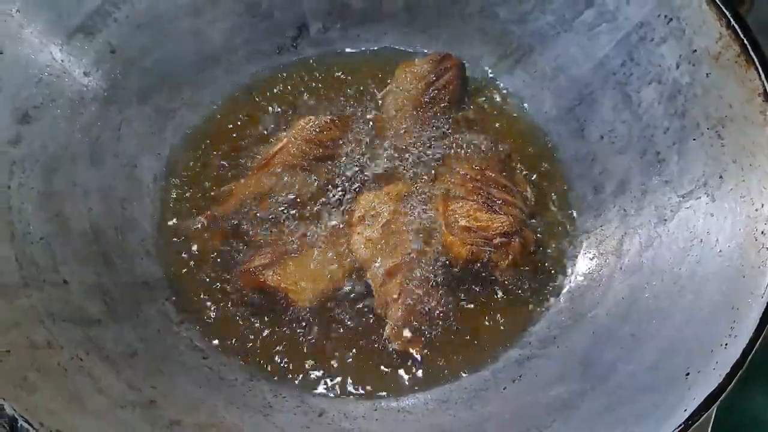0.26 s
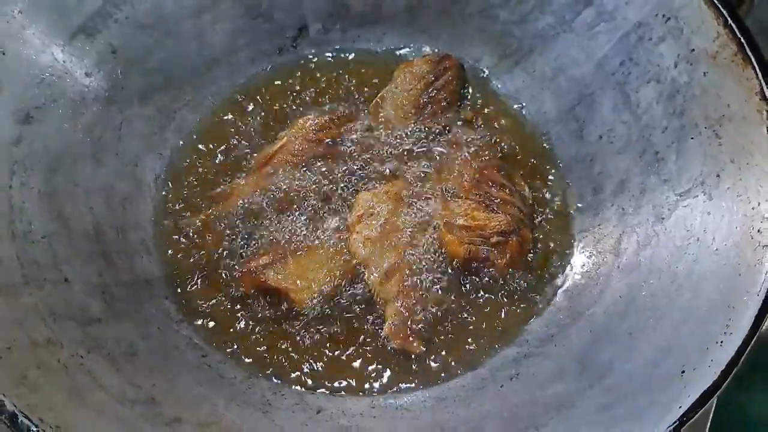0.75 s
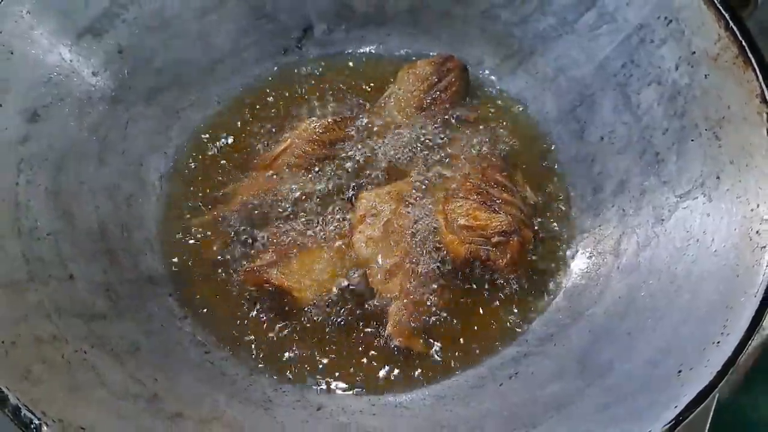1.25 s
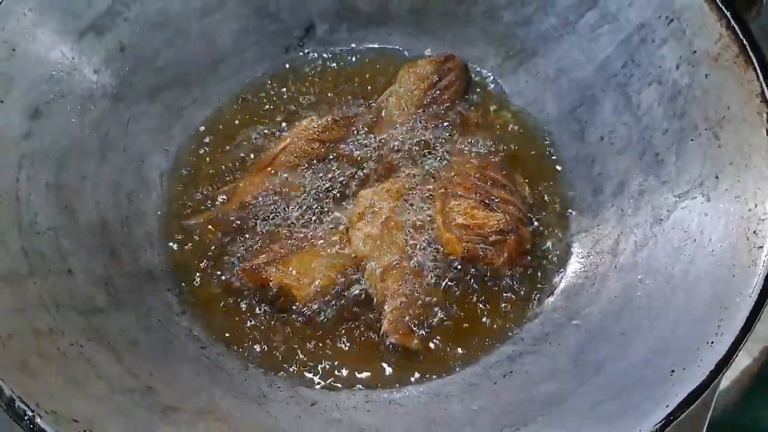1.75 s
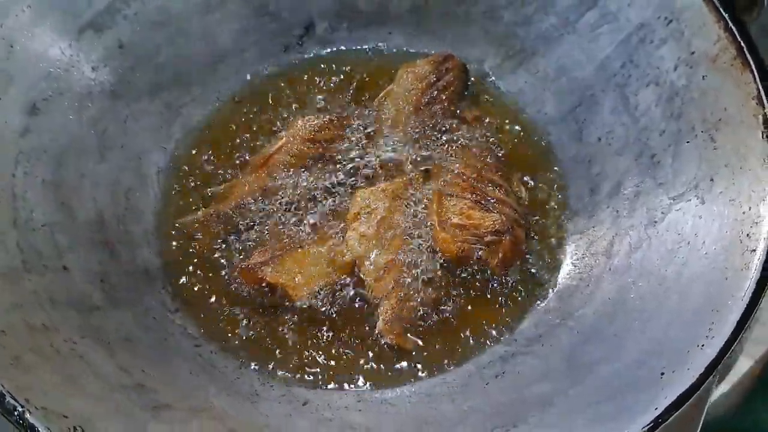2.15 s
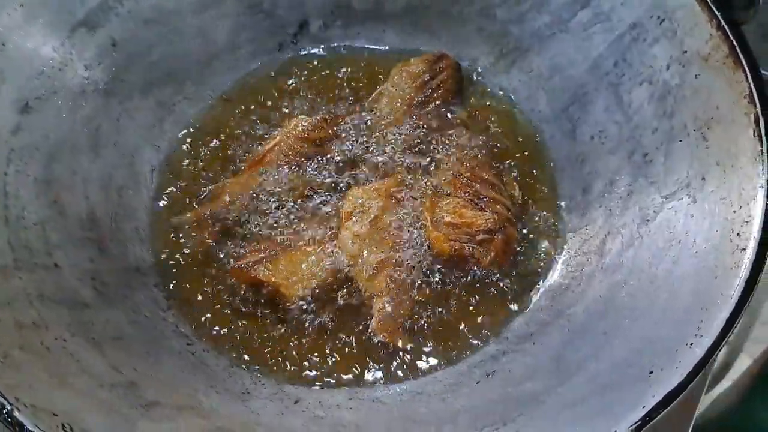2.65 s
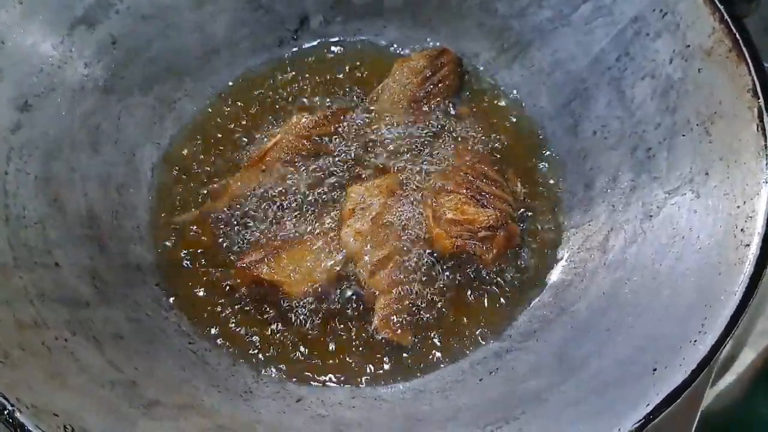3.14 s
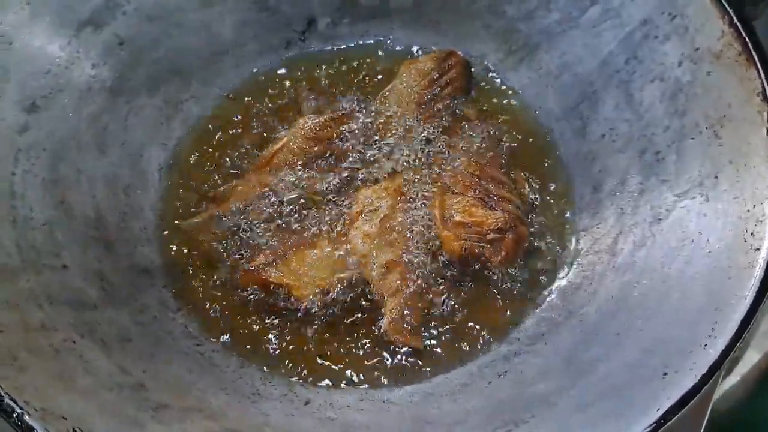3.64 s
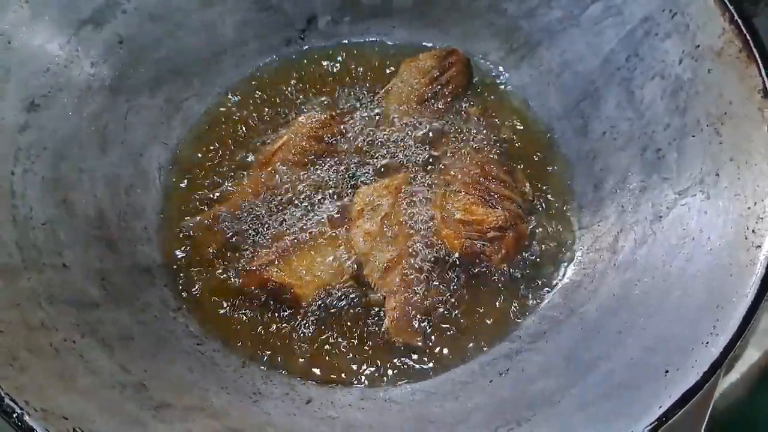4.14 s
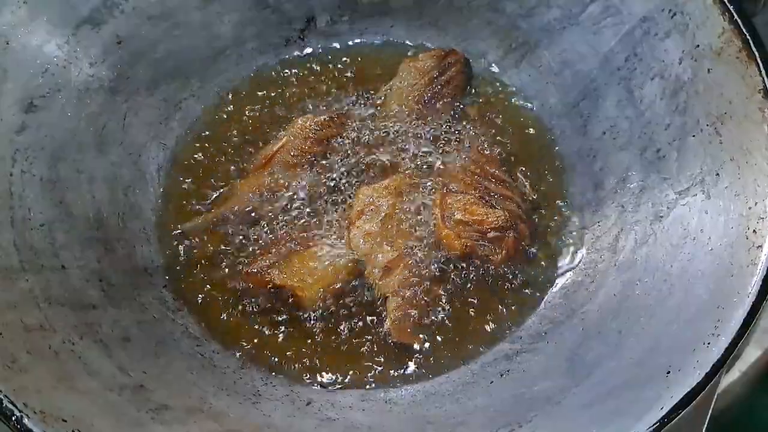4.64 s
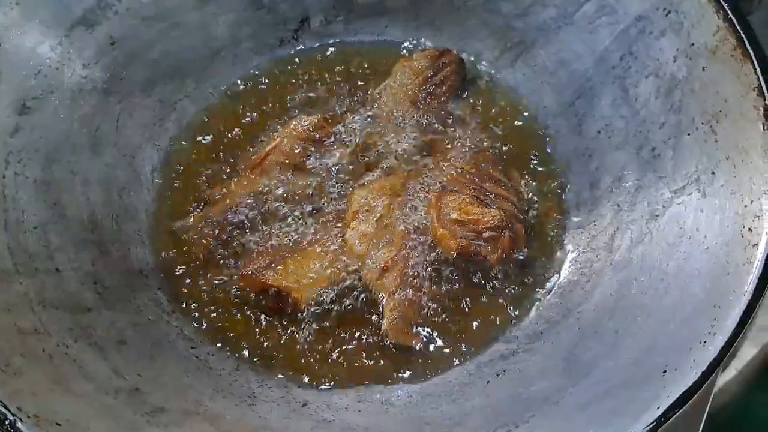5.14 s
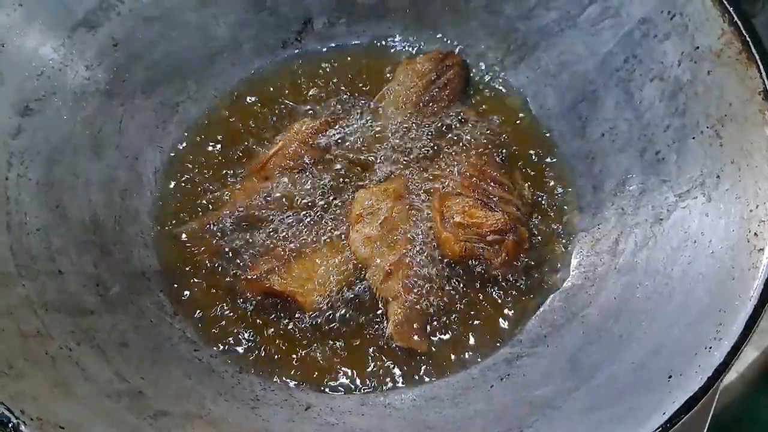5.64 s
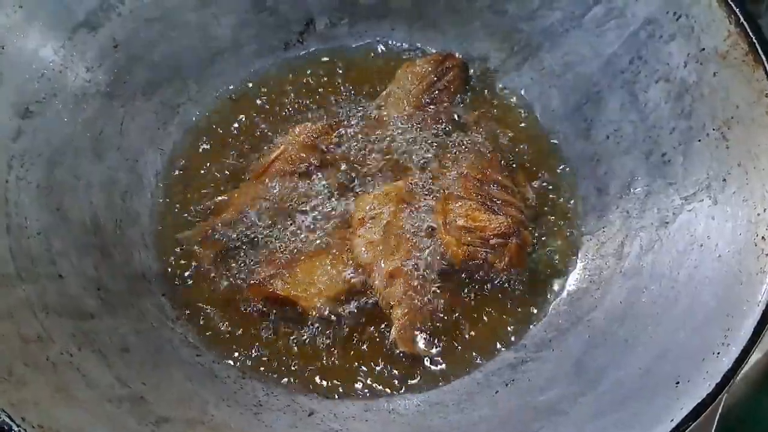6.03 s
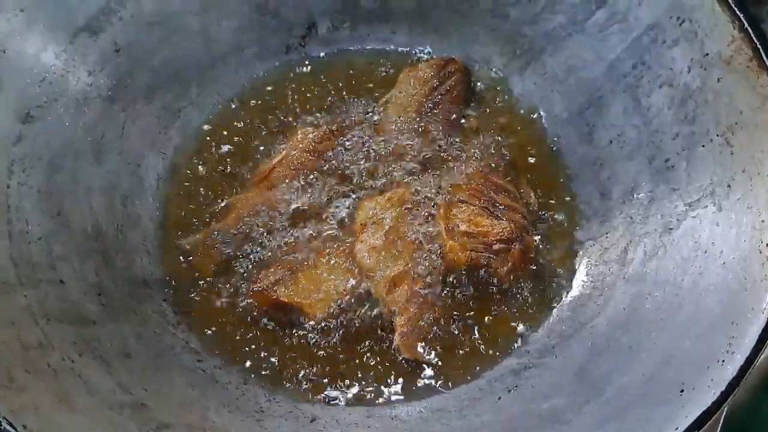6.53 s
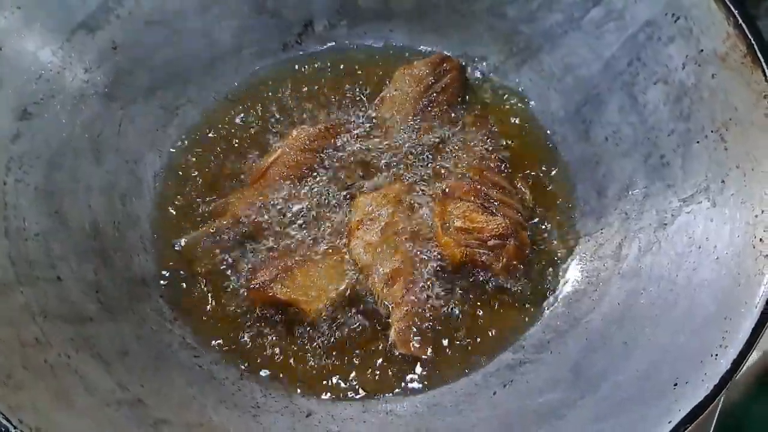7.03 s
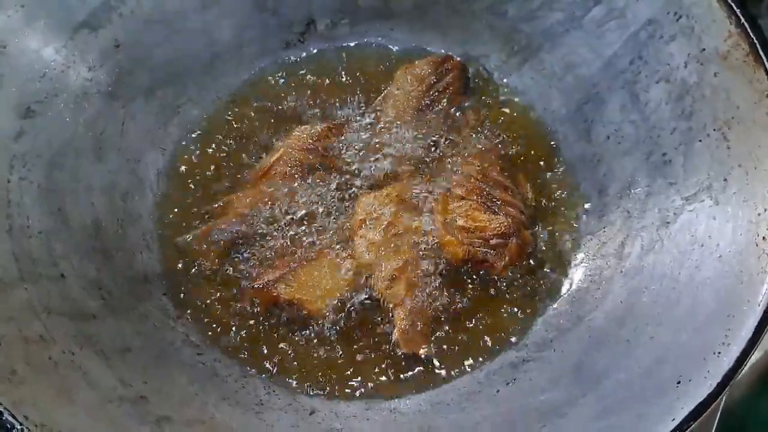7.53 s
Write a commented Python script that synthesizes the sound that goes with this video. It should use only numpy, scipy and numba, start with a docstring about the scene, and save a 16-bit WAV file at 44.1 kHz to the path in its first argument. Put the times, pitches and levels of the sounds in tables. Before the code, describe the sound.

Browned fish pieces fry in bubbling oil in a wide steel wok. A thin, steady sizzle and low simmer run throughout, gently rising and falling. Over it come dense crackles, sharp droplet spits and short hollow gurgling pops at irregular moments, the strongest cluster around 5.6 seconds. The bowl adds a faint metallic ring and short scatter. Close stereo microphone, brighter toward the right, with a quiet low kitchen hum.

```python
"""Fish frying in a wok

Fish fry in hot oil in a steel wok, close under a small two-port microphone. Water boils out of the flesh:
big steam pockets gurgle and droplets spit, as bursts of short swelling sines; a swarm of tiny bubbles over
shaped noise simmers and sizzles. The bowl rings faintly at its modes and scatters every pop as a short
noise tail; filtered noise makes the kitchen hum underneath."""
import sys
import numpy as np
from scipy import signal
from scipy.fft import rfft, irfft, next_fast_len
from scipy.io import wavfile
from numba import njit

SR = 44100
rng = np.random.default_rng(int(sys.argv[2]) if len(sys.argv) > 2 else 0)


def bounce(signal):
    """Save signal as a 16-bit WAV file at the path given by the first command-line argument."""
    frames = np.transpose(np.atleast_2d(signal))
    limited = np.clip(frames, -1, 1)
    pcm = np.round(limited * 32767).astype(np.int16)
    wavfile.write(sys.argv[1], SR, pcm)


def undo_db(level):
    """Turn decibels back into plain size, where 20 dB means ten times bigger."""
    steps = np.asarray(level, float) / 20
    return 10 ** steps


N = 343092  # samples, 7.78 s


def along(points, hz):
    """Reads (frequency, value) points on a log frequency axis."""
    point_hz, value = np.transpose(points)
    return np.interp(np.log(hz + 1), np.log(point_hz + 1), value)


def unit(x):
    """Scales x to rms 1."""
    return x / np.sqrt(np.mean(x ** 2) + 1e-20)


def filtered(x, response):
    """Multiplies the spectrum of x by a response of frequency."""
    size = next_fast_len(N + 8192)
    hz = np.fft.rfftfreq(size, 1 / SR)
    return irfft(rfft(x, size) * response(hz), size)[..., :N]


def coloured(x, spectrum):
    """Shapes x by a (frequency [Hz], gain [dB]) spectrum."""
    return filtered(x, lambda hz: undo_db(along(spectrum, hz)))


# colour of the pops as the ports hear them: (frequency [Hz], gain [dB])
PORT_COLOUR = [(88, -20.5), (150, -2), (293, -6), (417, -3.5), (1010, -5), (1690, -2), (2260, -3),
               (4080, -5), (7660, -7), (9330, -13.5), (12300, -5.5), (15600, -11.5), (16500, -30)]


def port_db(hz):
    """Gain of the ports at hz."""
    return along(PORT_COLOUR, hz)


# left port against right port: (frequency [Hz], level difference [dB])
PORT_TILT = [(60, -1.0), (120, 0.0), (240, 0.0), (480, 0.3), (950, -0.5), (1890, -3.5), (3770, -10.0),
             (7520, -8.0), (15000, -5.5)]


def tilt_db(hz):
    """Left-over-right level at hz."""
    return along(PORT_TILT, hz)


def tilted(x):
    """The body of the microphone shades the left port in the treble; each port takes half the difference."""
    halves = np.array([[.5], [-.5]])
    return filtered(x, lambda hz: undo_db(tilt_db(hz) * halves))


# likeness of the two ports: (frequency [Hz], correlation [0-1])
PORT_LIKENESS = [(60, 0.95), (180, 0.97), (550, 0.82), (1650, 0.86), (4970, 0.012), (15000, 0.01)]


def alike(pair):
    """Mixes two unrelated signals so that the ports share the bass and differ in the treble."""
    def mid_side_gain(hz):
        angle = np.arccos(np.clip(along(PORT_LIKENESS, hz), 0, 1)) / 2
        return np.array([np.cos(angle), np.sin(angle)])

    mid, side = filtered(pair, mid_side_gain)
    return np.array([mid + side, mid - side])


def alike_noise():
    """White stereo noise, rms 1, alike in the bass only."""
    return unit(alike(rng.standard_normal((2, N))))


@njit
def add_bubbles(out, start, hz, cycles, size, rise):
    """Each bubble is a sine that swells, dies within a few cycles and climbs in pitch as it nears the surface."""
    for k in range(len(hz)):
        life = cycles[k] / hz[k] * SR  # samples
        for i in range(int(6 * life) + 2):
            u = i / life
            wave = u * np.exp(1 - u) * np.sin(2 * np.pi * cycles[k] * u * (1 + rise * u))
            for port in range(2):
                j = start[k, port] + i
                if 0 <= j < out.shape[1]:
                    out[port, j] += size[k, port] * wave


def bubbles(time_s, hz, cycles, db, pan_db, lag_s):
    """Stereo sum of bubbles; each reaches the right port lag_s after the left, pan_db weaker."""
    out = np.zeros((2, N))
    start = np.round(np.stack([time_s, time_s + lag_s], 1) * SR).astype(np.int64)
    angle = np.arctan(undo_db(-pan_db))  # equal-power panning
    pan = np.sqrt(2) * np.stack([np.cos(angle), np.sin(angle)], 1)
    sign = rng.choice([-1, 1], (len(time_s), 1))  # a push or a pull comes first
    size = undo_db(db)[:, None] * pan * sign
    add_bubbles(out, start, np.clip(hz, 60, SR / 2.4), np.maximum(cycles, .2), size, .015)
    return out


def bursts(time_s, db, hz, ms, pan_db, lag_ms, cycles, spread, fade_db, count):
    """A ragged spray of bubbles of scattered pitch and size, fading over the length of the burst."""
    even = rng.random((len(time_s), count + 1))
    bell = rng.standard_normal((len(time_s), 3 * count))
    pitch, size, life = np.split(bell, 3, axis=1)
    lag_s = lag_ms / 1000 * 2 * even[:, :1]  # where in the wok it bursts; lag_ms is the mean
    wait = (np.arange(count) + even[:, 1:]) / count  # share of the burst
    length_s = np.maximum(ms, .3)[:, None] / 1000
    crowd = 1 + count * 3 * cycles / hz[:, None] / length_s  # overlapping bubbles share the energy
    ratio = np.exp(spread * (pitch - pitch.mean(1, keepdims=True)))
    stretch = np.exp(.25 * life)
    swell = np.minimum(.35 + wait / .2, 1)
    share = swell * undo_db(3.17 * size - fade_db * wait)
    share = share / np.sqrt(np.mean(share ** 2, 1, keepdims=True))  # a burst has a set energy to hand out
    level_db = db[:, None] + 10 * np.log10(share ** 2 * ratio / stretch / crowd)
    rows = np.broadcast_arrays(time_s[:, None] + wait * length_s, hz[:, None] * ratio, cycles * stretch,
                               level_db, pan_db[:, None], lag_s)
    return bubbles(*[row.ravel() for row in rows])


def gurgles(time_s, db, hz, ms, spread):
    """Large steam pockets, nearly alike at both ports; the wider the scatter of pitch, the shorter each bubble."""
    spread = np.clip(spread, .1, .7)[:, None]
    db = db - 2.0 - port_db(hz)
    centre = 0 * time_s
    body = bursts(time_s, db, hz, ms, centre, lag_ms=.14, cycles=.2 / spread, spread=spread,
                  fade_db=15.5, count=26)
    torn_surface = bursts(time_s, db - 4, 2.2 * hz, ms, centre, lag_ms=.14, cycles=.23, spread=.38,
                          fade_db=2.5, count=18)
    return tilted(body + torn_surface)


# loudest steam pockets: (time [s], level [dB], pitch [Hz], length [ms], pitch scatter [0-1])
LOUD_GURGLES = [(.096,-21,1590,11.4,0.38),(.114,-20,1690,16,.29),(.139,-20,1720,9.1,0.23),(.191,-22,810,12.2,0.41),(.238,-22.5,1600,9.6,0.3),(0.274,-12.5,1260,11.5,0.17),
                (.303,-24,1260,7.9,.36),(.319,-20.5,1360,24,.4),(.486,-26,525,8.8,0.2),(0.497,-15,455,23.2,0.2),(.524,-27,750,35,0.49),(.755,-14,954,10.5,0.31),(.768,-27.5,1170,25.4,0.18),
                (0.923,-29,925,10.8,0.22),(.994,-28.5,1170,12.7,0.22),(1.13,-24,1800,17.4,0.14),(1.156,-19,1340,17,0.44),(1.358,-17.5,1510,10.4,.47),(1.376,-20,1360,10.7,0.5),(1.441,-18.5,1080,10.7,0.75),
                (1.513,-26.5,1080,17,0.47),(1.537,-27,1150,12.4,0.4),(1.656,-22,1030,26.3,.51),(1.748,-29,620,13,0.57),(1.766,-29.5,1200,18.6,0.65),(1.809,-29,960,29,0.28),(1.846,-15.5,1264,2.6,0.13),(1.984,-21,1550,12,0.24),
                (2.068,-28,920,12.1,0.29),(2.211,-24,1210,10.5,0.38),(2.48,-21,1210,11.7,0.47),(2.526,-20,1200,14.4,0.54),(2.719,-26.5,790,14.2,0.47),(2.897,-13,1110,17.2,0.38),
                (3.003,-24,1390,18,.27),(3.064,-27,1060,11.8,.43),(3.311,-26,720,24,0.48),(3.341,-15,646,4.3,0.2),(3.347,-12.5,1600,19.6,0.37),(3.392,-25,1230,11.5,0.25),
                (3.41,-13.5,637,5.2,0.44),(3.419,-10.5,1400,10.8,0.35),(3.432,-33,1360,38,0.57),(3.486,-24,1270,10,0.33),(3.701,-20.5,1550,14.3,0.26),(3.774,-23.5,1770,29,0.3),
                (4.058,-11,1290,16.6,0.34),(4.257,-21.5,1300,9.5,0.58),(4.571,-15,1160,22.7,0.44),(4.614,-21,1390,13.4,0.46),(4.645,-14,1300,13,0.36),(4.805,-22.5,1130,16.8,0.57),
                (5.019,-14.5,556,6.2,0.35),(5.026,-21.5,710,11.1,.31),(5.094,-22.5,1000,8,0.27),(5.103,-29,1030,14,0.5),(5.231,-28,806,26.4,0.62),(5.317,-22,1300,17.8,0.29),(5.474,-28.5,690,12.3,0.31),
                (5.532,-28.5,577,13,0.42),(5.595,-20,1130,4.8,0.3),(5.605,-9,1210,5,0.22),(5.61,-7,1030,19.5,0.38),(5.638,-17,1190,6.9,0.29),(5.645,-14,1240,12.8,0.4),(5.742,-27.5,1050,22.6,0.4),
                (5.837,-13.5,1180,15.6,0.28),(5.856,-25.5,895,27,.32),(6.051,-24.5,845,11.4,0.34),(6.118,-26,1110,13,0.27),(6.206,-19,1170,9.6,0.4),(6.276,-22,1160,5.6,0.47),
                (6.283,-21,1250,10.3,0.23),(6.501,-20,1420,14.6,0.4),(6.524,-20,810,12,0.57),(6.596,-22.5,960,9.8,0.17),(6.638,-19.5,447,9.9,0.44),(6.774,-23,1920,9,0.14),
                (6.861,-17,910,10,0.3),(6.877,-20,750,3.8,0.28),(7.005,-14.5,1330,13,0.58),(7.053,-26,1010,13.2,0.6),(7.11,-17.5,1170,15.3,0.28),(7.16,-25.5,1140,14,0.47),
                (7.367,-27.5,1070,19,0.71),(7.412,-28,1290,12.3,0.3),(7.488,-25.5,1310,20,0.44),(7.574,-18.5,980,9.8,0.37),(7.663,-28,1420,12,0.35),(7.722,-19.5,545,12.7,0.42),(7.76,-13.5,1410,16,0.28)]


def loud_gurgles():
    """The loudest steam pockets bursting, each at its set time."""
    return gurgles(*np.transpose(LOUD_GURGLES))


def burble(top_db, range_db, count):
    """The many fainter steam pockets, at random."""
    when, size, pitch, length, mixed = rng.random((count, 5)).T
    db = top_db - range_db * size
    return gurgles(when * N / SR, db, 800 + 800 * pitch, 8 + 12 * length, .34 + .2 * mixed)


def spits(time_s, db, hz, ms, treble_db, pan_db):
    """Droplets flashing to steam: a cluster of ticks with a bright hissing edge."""
    edge_hz, edge_trim_db = 11700, 4.5
    edge_db = db + edge_trim_db + treble_db - port_db(edge_hz)
    edge = bursts(time_s, edge_db, edge_hz + 0 * hz, ms, .49 * pan_db, lag_ms=.25, cycles=.35, spread=.44,
                  fade_db=8, count=14)
    ticks = bursts(time_s, db - .5 - port_db(hz), hz, ms, pan_db, lag_ms=.2, cycles=1.25, spread=.16,
                   fade_db=6.5, count=14)
    return edge + ticks


# loudest droplets: (time [s], level [dB], pitch [Hz], length [ms], treble edge against ticks, untrimmed [dB])
LOUD_SPITS = [(.098,-9,4250,2,-24),(.101,-4.5,4270,2,-16),(.106,-4,4150,1,-26),(0.115,-9,4330,1.2,-17),(.12,-13,6280,3,-14),
              (.188,-8,4750,2.4,-1),(.192,-10,5050,4,-7),(.194,-15,9150,4,8),(0.204,-20,8010,5,3),(0.279,-28,4730,2.3,7),(.296,-20,4950,5,-18),
              (.309,-18.5,4070,7,-19),(0.322,-21,6100,4,-6),(.39,-12.5,5600,1,-15),(.427,-25.5,3530,2.8,-19),(.533,-17,4560,10,-22),(.57,-25,10400,2.5,5),(.619,-16,7200,1.1,2),
              (.697,-20,4500,8,-23),(.74,-23,4570,13,-22.5),(.756,-12.5,8500,4,-1),(.773,-9.5,11500,2.7,-3.5),(.839,-23,7200,4,-2),(.983,-12,6700,1,-9),
              (.996,-19.5,3520,1.8,-4),(1.079,-23,6720,1.8,-13),(1.127,-9.5,4900,.7,-2),(1.133,-19.5,3660,10,-21),(1.145,-12,9600,.9,-2),(1.149,-27,5760,9,-5),(1.164,-25,3500,9,-3),
              (1.25,-15,4600,3.7,-4),(1.302,-22,6300,6.5,-1),(1.36,-23,3070,9,-16),(1.376,-15.5,4000,1,6),(1.379,-8.5,3370,4,-3.5),
              (1.443,-12,5260,1.5,3),(1.489,-15,5550,1.2,-12),(1.543,-31,5200,11,12),(1.655,-2.5,4500,1.5,-26),(1.661,-6,5000,9,-9.5),
              (1.677,-20,5470,10,-1),(1.708,-10,3900,1.1,-24),(1.768,-19,4800,3.5,-18),(1.805,-17.5,8300,.9,-4),(1.818,-22.5,4800,8,0),
              (1.857,-14,4600,3,-5),(1.979,-9,4550,2,-12),(1.986,-20.5,5800,1,9.5),(2.01,-19.5,4380,5,-9),(2.083,-16,7700,1.2,-13),
              (2.171,-11.5,12100,1,-12),(2.228,-15.5,12200,.5,-12),(2.46,-19,4240,.6,-19),(2.481,-17,6140,3,-8),(2.53,-27.5,3720,8,0),
              (2.891,-15,5900,1,-8),(2.899,-7,6800,6,-3),(2.904,-9,6350,14,-2.5),(2.925,-19,6850,11,-11),(3.006,-22.5,5760,23,4),(3.033,-17.5,9100,2,-8),
              (3.1,-23,9800,4,-5),(3.162,-13,11800,1.3,-7),(3.304,-24,9530,0.85,-16),(3.315,-15,5380,1.7,-9),(3.322,-20.5,4230,11,5),(3.342,-22,4530,2.9,-1),(3.348,-16,3400,3,-18),
              (3.353,-12,2900,5,-15),(3.364,-18,3010,8,-16),(3.41,-22,3250,10,-4),(3.421,-26,3200,12,4.5),(3.704,-7.5,4450,5.6,-17),
              (3.709,-10,5850,6,-20),(3.732,-21,3980,9,-13),(3.777,-20,3640,4,-5),(3.794,-27.5,5200,9,6),(3.841,-15,4540,2,-23),
              (3.934,-17,6700,2.2,-19),(3.95,-15.5,7900,1.4,-8),(3.974,-24,10400,2,0),(4.014,-13.5,6000,1.8,-18),(4.019,-12.5,10500,1.8,-8),
              (4.033,-20,7460,2.7,-15),(4.059,-23.5,3130,13,8),(4.099,-22,4930,6,-4),(4.222,-22,4890,6,-16),(4.258,-18.5,5460,14,-12),
              (4.438,-23,8350,1.7,2),(4.528,-22.5,7900,3,-11),(4.572,-15,4940,3,1),(4.58,-18.5,5400,10,9),(4.584,-13,4787,4,-8),
              (4.646,-11,4650,1.2,-12),(4.785,-26,8900,4,2),(5.072,-21,8200,0.99,-3),(5.106,-11,7000,2,-2),(5.191,-20,9200,1,-13),(5.213,-13,4770,1,-12),
              (5.321,-20.5,4200,5,-3),(5.477,-22.5,4700,3.7,-26),(5.592,-17.5,4100,1.8,-7),(5.608,-12,5000,1,1),(5.609,-3.5,3640,3.3,-12),
              (5.616,-14,3450,7,1.5),(5.623,-20,2900,11,5),(5.642,-29.5,3000,24,9),(5.722,-21,7050,3.5,0),(5.771,-26,10800,1,3),(5.798,-24.5,5100,10,-17),
              (5.837,-15.5,5850,3,-5),(5.855,-21,4000,2,-17),(5.9,-18,3600,2.2,-20),(5.915,-34.5,6700,8,12),(5.967,-25,5900,6,1),(5.996,-20,11100,.9,0),
              (6.024,-15,11800,1.2,-12),(6.062,-14,4050,.5,-20),(6.108,-23,6820,3,-1),(6.162,-22.5,5500,6,-1),(6.208,-19.5,6000,4.5,9),
              (6.212,-20.5,5000,25,-3),(6.41,-14,10800,.8,-14),(6.505,-27.5,4630,11,10.5),(6.639,-23.5,4560,8,1),(6.86,-27.5,5100,7,2),
              (7.006,-8.5,3820,4,-4),(7.015,-19,3310,10,-12),(7.082,-7,7900,1,-22),(7.113,-8.5,4160,2.7,-6),(7.117,-16.5,4500,7,3),
              (7.138,-22,5800,10,-5),(7.164,-11,4160,3.5,-6),(7.237,-22.5,6400,3,-18),(7.331,-15,5200,1.2,-23),(7.368,-22.5,4340,13,1),(7.414,-16,4050,3,-4),
              (7.42,-20,6100,6,-7),(7.475,-22,10700,7,-6),(7.491,-12,11000,3,3.5),(7.495,-19,6640,13,6),(7.57,-16.5,5900,3.4,3.5),
              (7.572,-9,4530,9,0),(7.624,-8,3870,.6,-11),(7.681,-11.5,8800,.8,3.5),(7.687,-23,7360,8,-8),(7.724,-10.5,4750,8,-6),
              (7.732,-18,5230,7,1),(7.749,-8.5,3920,4.4,-12),(7.756,-9.5,3360,2.4,-1),(7.762,-12,4450,10,-2),(7.771,-13,5100,5,-15)]


def loud_spits():
    """The loudest droplets, each at its own spot, louder at the right port by a varying amount."""
    rows = np.transpose(LOUD_SPITS)
    pan_db = -12 + 3.5 * rng.standard_normal(rows.shape[1])
    return spits(*rows, pan_db)


def crackle(top_db, range_db, count):
    """The many fainter droplets and small bubbles, at random."""
    when, size, pitch, length, bright, side = rng.random((count, 6)).T
    hz = 1300 * 8.5 ** pitch
    db = top_db - range_db * size ** .52
    pan_db = tilt_db(hz) + 5 * (side - .5)
    return spits(when * N / SR, db, hz, 7 * length ** 2, -4 - 20 * bright, pan_db)


def swarm(low_hz, high_hz, cycles, scatter_db, hiss, count):
    """Many random small bubbles, a few much larger than the rest, over the blur of those too small to tell apart."""
    when, pitch, size, side, lag = rng.random((count, 5)).T
    hz = low_hz * (high_hz / low_hz) ** pitch
    db = 20 * np.log10(hz) - scatter_db * np.log(1.003 - size)
    grains = bubbles(when * N / SR, hz, cycles + 0 * hz, db, 4 * (side - .5), .00025 * lag)
    return unit(grains) + hiss * alike_noise()


# strength of the boiling: (time [s], level [dB])
BOIL_STRENGTH = [(0.0, -41.5), (0.37, -41), (0.5, -41.5), (1.15, -40.5), (1.34, -38.5), (1.86, -40),
                 (2.1, -43), (2.53, -43.5), (3.96, -42), (4.24, -42.5), (5.16, -39.5), (5.46, -41),
                 (6.07, -39), (6.46, -43), (6.69, -43), (7.78, -40)]
# colour of the low simmer: (frequency [Hz], gain [dB])
SIMMER_COLOUR = [(120, -36), (200, -5), (483, -5.5), (575, 1), (2210, -8.5), (3200, -26), (4160, -42),
                 (7040, -120)]
# colour of the high sizzle: (frequency [Hz], gain [dB])
SIZZLE_COLOUR = [(880, 10), (1500, 7), (2070, 10), (2220, -7), (2600, 10), (4010, 12), (6360, 7.5),
                 (7770, 12.5), (9500, -3), (12300, 10.5), (15700, -1.5), (16500, -30)]


def boiling():
    """The steady frying: a low simmer of larger bubbles and a high sizzle of tiny ones, of varying strength."""
    strength = undo_db(np.interp(np.arange(N) / SR, *np.transpose(BOIL_STRENGTH)))
    simmer = swarm(200, 3000, cycles=.5, scatter_db=3, hiss=.8, count=8000)
    sizzle = swarm(1500, 16000, cycles=.8, scatter_db=3.2, hiss=.7, count=30000)
    simmer = undo_db(-5) * unit(coloured(simmer, SIMMER_COLOUR))
    sizzle = unit(coloured(sizzle, SIZZLE_COLOUR))
    return tilted(strength * (simmer + sizzle))


# modes of the wok: (frequency [Hz], level [dB], t60 [s])
WOK_MODES = [(422, -3, .09), (592, 0, .12), (788, -2, .09), (1019, 1, .12), (1353, 0, .09), (1523, -2, .08),
             (1713, -1, .08), (1844, -3, .08), (2062, -3, .07), (2463, -5, .06), (2655, -5, .06)]


def wok(pops):
    """Pops shake the steel, which rings at its modes, the same at both ports."""
    t = np.arange(SR // 2) / SR
    ring = sum(undo_db(db - 60 * t / t60_s) * np.sin(2 * np.pi * hz * t) for hz, db, t60_s in WOK_MODES)
    return signal.fftconvolve(pops.mean(0), ring / np.linalg.norm(ring))[:N]


# scattering in the bowl and off the walls: (frequency [Hz], t60 [s])
SCATTER_DECAY = [(300, 0.019), (2000, 0.16), (12000, 0.069)]


def scattered(x, count):
    """A short diffuse tail of decaying noise, different at each port and for each of count time slices."""
    out = np.zeros((2, N + SR))
    for k, part in enumerate(np.array_split(x, count, axis=1)):
        hz, t, noise = signal.stft(rng.standard_normal((2, SR // 6)), SR, nperseg=128)
        decay = undo_db(-60 * t / along(SCATTER_DECAY, hz)[:, None])
        tail = signal.istft(noise * decay, SR, nperseg=128)[1]
        tail = tail / np.linalg.norm(tail, axis=1, keepdims=True)
        wet = signal.fftconvolve(part, tail, axes=1)
        start = 60 + k * N // count  # tail lags by 60 samples
        out[:, start:start + wet.shape[1]] += wet
    return out[:, :N]


# kitchen hum: (frequency [Hz], gain [dB])
HUM_COLOUR = [(15, -36), (25, -19), (65, 5.5), (103, -3), (162, 1), (350, -8.5), (460, -3.5), (770, -120)]


def kitchen():
    """Low hum of the burner and the room: noise held to the bass."""
    hum_rms_db = -50
    return undo_db(hum_rms_db) * unit(coloured(alike_noise(), HUM_COLOUR))


def scene():
    """All sources at the two ports."""
    loud = loud_gurgles() + loud_spits()
    faint = burble(top_db=-30, range_db=4, count=30) + crackle(top_db=-29, range_db=7, count=700)
    pops = coloured(loud + faint, PORT_COLOUR)
    tails = undo_db(-7) * tilted(alike(scattered(pops.mean(0, keepdims=True), count=120)))
    ring = undo_db(-17.5) * wok(pops)
    return pops + tails + ring + boiling() + kitchen()


def roll_off(x):
    """The treble ends steeply here."""
    return signal.sosfilt(signal.butter(12, 16990, fs=SR, output="sos"), x)


def record(dry):
    """Steps the treble above 15.9 kHz down by 14 dB to finish the mix."""
    mix = filtered(dry, lambda hz: undo_db(-14 * (hz > 15900)))
    return roll_off(mix)


dry = scene()
out = record(dry)
bounce(out)
```